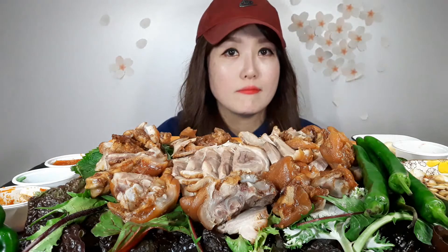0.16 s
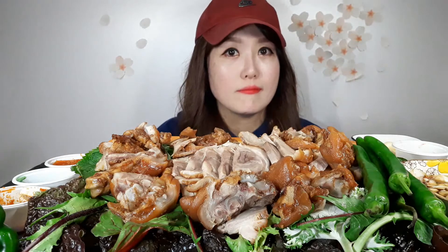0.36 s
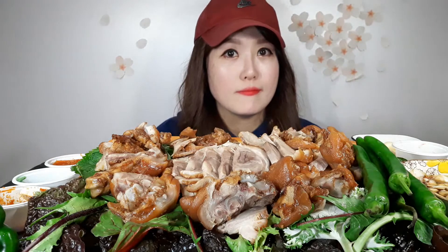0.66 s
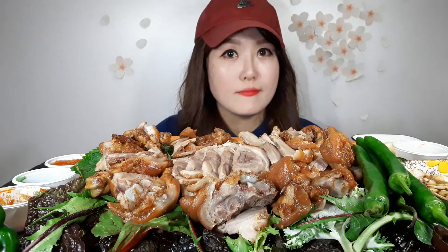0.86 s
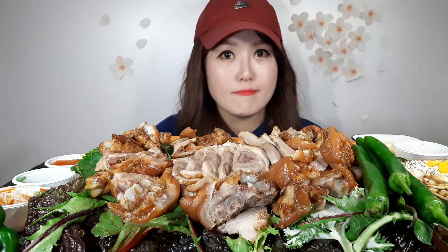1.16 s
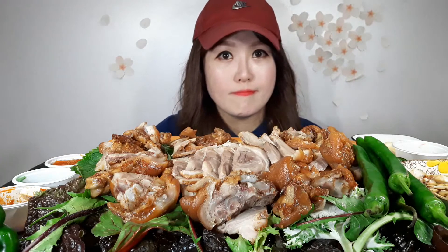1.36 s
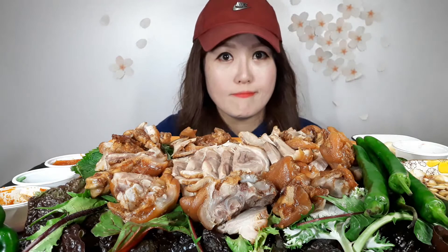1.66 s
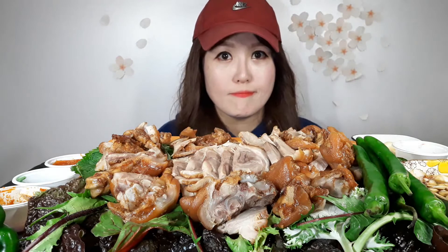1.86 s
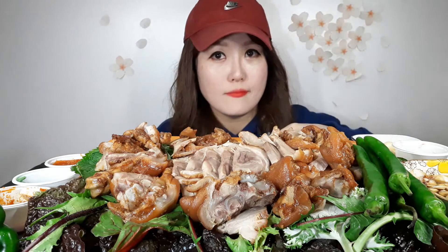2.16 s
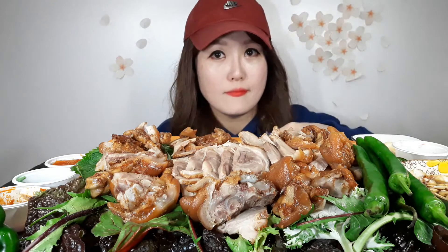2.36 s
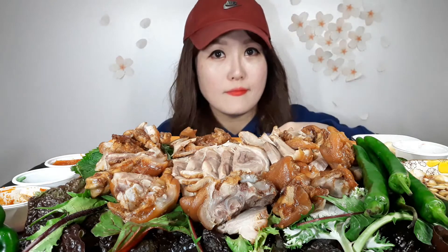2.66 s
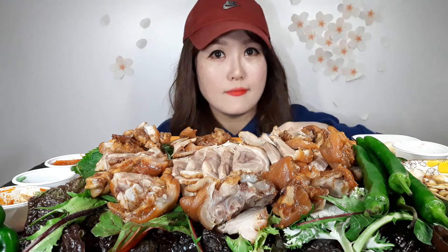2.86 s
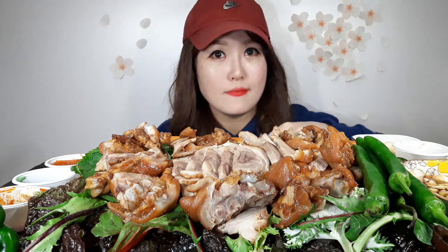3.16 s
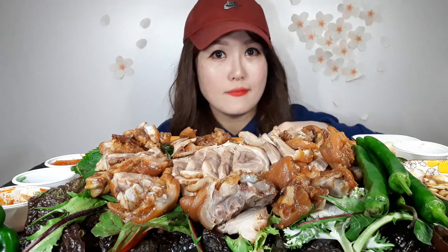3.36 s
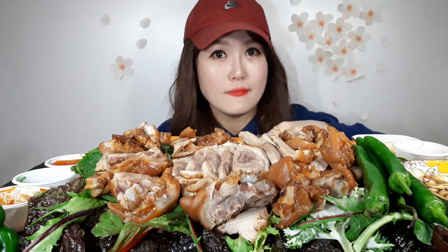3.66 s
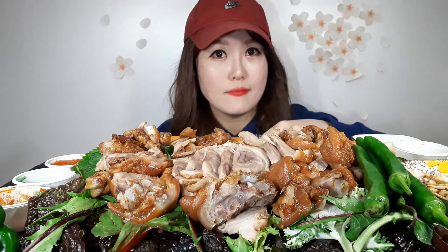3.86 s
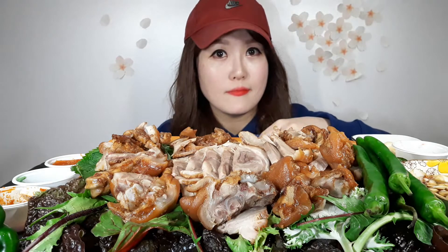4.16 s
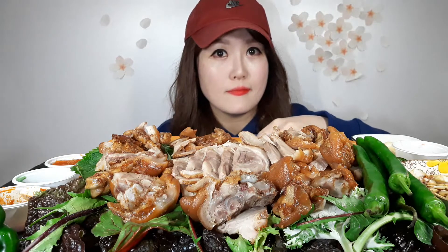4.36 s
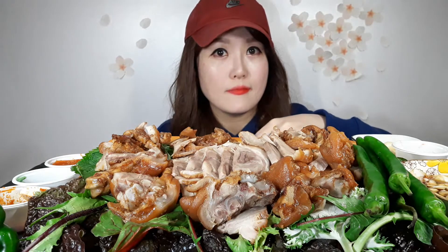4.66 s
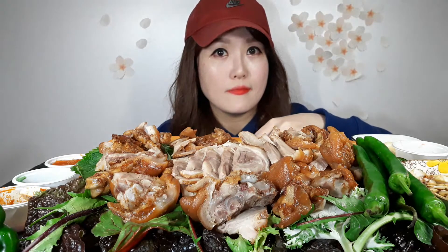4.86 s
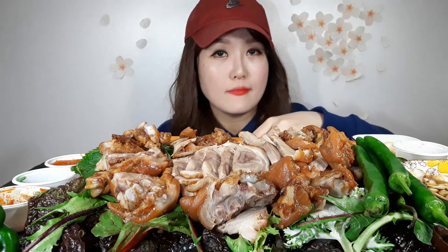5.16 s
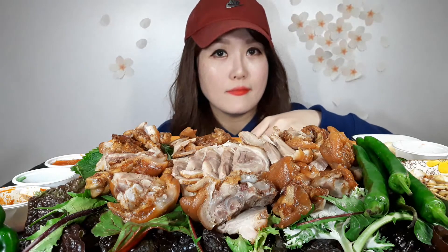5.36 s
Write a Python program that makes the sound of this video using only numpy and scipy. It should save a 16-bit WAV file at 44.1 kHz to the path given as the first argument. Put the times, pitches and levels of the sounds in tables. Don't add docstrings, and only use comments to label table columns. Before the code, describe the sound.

Quiet skin rubs and nail clicks on a thin can lead to a loud double snap of the tab and a short hiss of gas. After some light handling, the sound cuts straight to a very close, dry pour: bubbly knocks inside a glass, crisp fizzing, sharp little snaps, then low puffs of air as foam nears the rim. The pour is still going when it ends.

```python
import sys
import numpy as np
from scipy import signal
from scipy.io import wavfile
from scipy.ndimage import uniform_filter1d, minimum_filter1d

SR = 44100
rng = np.random.default_rng(int(sys.argv[2]) if len(sys.argv) > 2 else 0)


def elevation(decibels):
    levels = np.asarray(decibels, float)
    return 10 ** (levels / 20)


def master(y):
    cut = np.clip(np.atleast_2d(y).T, -1, 1)
    pcm = np.round(cut * 32767)
    wavfile.write(sys.argv[1], SR, pcm.astype(np.int16))


N = 242550
NOW = np.arange(N) / SR
CUT_S = 2.1005


def evened(x):
    return x / np.sqrt(np.mean(x ** 2) + 1e-20)


def read(points, hz):
    f, value = np.transpose(points)
    return np.interp(np.log(hz + 1), np.log(f + 1), value)


def columns(rows, t):
    s, *values = np.transpose(rows)
    return [np.interp(t, s, v) for v in values]


def add(mix, s, sound):
    part = mix[round(s * SR):][:len(sound)]
    part += sound[:len(part)]


def sine(hz, t):
    return np.sin(2 * np.pi * hz * t)


def highpass(order, hz):
    return signal.butter(order, hz, "highpass", fs=SR, output="sos")


def mode(hz, centre_hz, width):
    return 1 / (1 + 2j * (hz - centre_hz) / width)


def shape(x, response):
    hz, t, z = signal.stft(x, SR, nperseg=2048, noverlap=1792)
    gain = response(hz[:, None] + 1, t)
    gain = gain / np.sqrt(np.mean(abs(gain) ** 2, 0))
    return evened(signal.istft(z * gain, SR, nperseg=2048, noverlap=1792)[1][:len(x)])


def crackle(per_s, spread_db):
    size = elevation(spread_db * np.minimum(rng.exponential(1, N), 5)) * rng.standard_normal(N)
    return evened(size * (rng.random(N) < per_s / SR))


def burst(hz, spread, length):
    t = np.arange(3500) / SR
    band = [hz / (1 + abs(spread)), min(hz * (1 + abs(spread)), 17000)]
    bandpass = signal.butter(3, band, "bandpass", fs=SR, output="sos")
    noise = signal.sosfilt(bandpass, rng.standard_normal(3500))
    y = noise * t / length * np.exp(-3 * t / length)
    return y / abs(y).max()


def shell(hz, modes, direct):
    return direct + sum(elevation(db) * mode(hz, f, w) for f, w, db in modes)


def swells(rows):
    rest_db = -88
    return elevation(rest_db) + sum(elevation(db) * np.exp(-((NOW - s) / half) ** 2) for s, db, half in rows)


# middle t/s, level/dB, half length t/s
LEANS = [
    (.3, -82, .1),
    (1.1, -64.5, 0.16),
    (1.33, -65, 0.074),
    (1.61, -76.5, 0.092),
    (2.02, -71, .05),
]


def leaning():
    rumble = shape(crackle(2300, 1.7), lambda hz, t: mode(hz, 60, 130) * hz / (hz + 40))
    return elevation(-1.0) * swells(LEANS) * rumble


# middle t/s, level/dB, half length t/s
SLOSHES = [
    (.83, -89, .06),
    (1.18, -74, 0.085),
    (1.51, -64.5, 0.033),
    (1.89, -61.5, 0.079),
    (2.03, -70, 0.046),
]


def sloshing():
    def gurgle(hz, t):
        return mode(hz, 800, 460) * hz / (hz + 200) + 0.22 * mode(hz, 2100, 1500)
    return elevation(-0.5) * swells(SLOSHES) * shape(crackle(1000, 1.7), gurgle)


# t/s, level/dB
GRIP = [(0.0, -69), (0.27, -67.5), (0.42, -66.5), (0.69, -68.5), (0.83, -64), (0.93, -58.5), (1.07, -56),
        (1.17, -47.5), (1.24, -56), (1.35, -55), (1.51, -61.5), (1.61, -67), (1.88, -65), (2.02, -64),
        (2.09, -72.5)]
# f/Hz, level/dB (per Hz)
RUB = [(530, -54), (900, -28), (1130, -22), (1610, -8.5), (2070, -16), (2510, -9), (4880, -13.5),
       (5910, -15), (15500, -22)]
# f/Hz, width f/Hz, level/dB
HELD = [(1200, 200, -12), (1600, 330, 1), (2390, 250, -13.5), (2900, 130, -4), (3550, 130, -3.5),
        (4600, 300, -3), (5640, 500, -2), (6360, 770, -2)]


def rubbing():
    def skin(hz, t):
        patches = uniform_filter1d(rng.standard_normal((len(hz), len(t))), 25, 0)
        patches = evened(uniform_filter1d(patches, 9, 1))
        return elevation(read(RUB, hz) + 3.5 * patches) * abs(shell(hz, HELD, .3))
    return elevation(columns(GRIP, NOW)[0] - 2.0) * shape(crackle(9000, 2.5), skin)


# t/s, peak level/dB, centre f/Hz, length t/s, spread as a share of the centre
SCRAPES = [(0.298, -45, 3000, 0.028, 0.44), (0.31, -31, 3140, 0.0092, 0.28), (0.31, -42, 1440, 0.02, 0.17),
           (0.31, -40.5, 6300, 0.022, 0.2), (0.72, -48.5, 3100, 0.022, 1.2), (0.76, -38, 3600, 0.021, 1.16),
           (1.016, -45.5, 2440, .006, 0.073), (1.027, -48, 5500, .008, .8),
           (1.510, -36.5, 5300, 0.004, 0.48), (1.509, -48, 640, 0.0055, .35),
           (0.125, -51.5, 1200, 0.0045, 0.32), (1.512, -46, 1230, 0.0093, 0.1),
           (1.66, -51, 5800, .03, 0.27), (1.661, -52.5, 3700, 0.019, 0.033)]
# t/s, peak level/dB, centre f/Hz
TICKS = [(0.1281, -60, 2200), (0.34, -45.5, 1600), (0.3636, -39.5, 5050), (0.375, -56, 6280),
         (0.404, -40.5, 2900), (0.418, -39, 5070), (0.4804, -41.5, 5400), (0.655, -55, 1590),
         (0.654, -54, 6300), (0.3635, -48, 2400), (0.4804, -46, 2800), (0.985, -49, 1500),
         (0.58, -60, 8000), (0.606, -61, 7800), (1.141, -46, 1640), (1.2094, -49, 3600), (1.489, -38, 2560),
         (1.51, -25.5, 2690), (1.5539, -47, 1445), (1.6606, -47, 3850), (1.683, -52.5, 7400),
         (1.769, -50, 4950), (1.836, -47.5, 1010), (1.936, -54.5, 2480)]


def ticking():
    tick_s, tick_spread = .0012, .85
    ring_db, ring_s = -13, .0035
    out, t = np.zeros(N), np.arange(2000) / SR
    for s, db, hz, length, spread in [(*row, tick_s, tick_spread) for row in TICKS] + SCRAPES:
        add(out, s - .001, elevation(db) * burst(hz, spread, length))
    for s, db, hz in TICKS:
        add(out, s, elevation(db + ring_db) * sine(hz, t) * np.exp(-t / ring_s))
    return out


# f/Hz, width f/Hz, level/dB
CAN = [(1640, 160, 1.5), (2817, 210, 5), (3620, 170, 1.5), (4380, 51, 2.5), (5240, 160, 5.5),
       (5780, 720, 9.5), (6460, 820, -4.5)]
# f/Hz, level/dB (per Hz)
TEAR = [(530, -73), (900, -25), (1570, -8.5), (4010, -5), (4360, 4), (4800, -13.5), (5890, -8.5),
        (16000, -58.5)]
# f/Hz, time to fall by 60 dB t/s
VENT = [(1200, 0.27), (3000, 0.14), (6000, 0.15), (10000, 0.37)]


def gas_jet():
    t = np.arange(SR // 2) / SR
    rise_s = .022
    hz, frames, z = signal.stft(rng.standard_normal(len(t)), SR, nperseg=512, noverlap=448)
    dying_db = read(TEAR, hz)[:, None] - 60 * np.outer(1 / read(VENT, hz), frames)
    wall = abs(shell(hz, CAN, .2)) * hz ** 8 / (hz ** 8 + 1400 ** 8)
    jet = signal.istft(z * elevation(dying_db) * wall[:, None], SR, nperseg=512, noverlap=448)[1][:len(t)]
    flutter_db = 2.9 * evened(uniform_filter1d(rng.standard_normal(len(t)), size=130))
    out = np.zeros(N)
    add(out, 1.284, elevation(-31.5) * evened(jet * np.minimum(t / rise_s, 1) * elevation(flutter_db)))
    return out


# t/s, peak level/dB, length t/s
TEARS = [(1.2815, -24, 0.0034), (1.2842, -1.5, 0.0012), (1.2857, .5, 0.0012), (1.2877, -6.5, 0.0015),
         (1.2945, -12, .002), (1.2960, -4, .0012), (1.2973, -2.5, .0009), (1.2995, -12, .003),
         (1.3005, -9.5, 0.0022), (1.3040, -8, .003), (1.3090, -12, .003), (1.3122, -14.5, .003),
         (1.3150, -13, .003), (1.323, -16, .003), (1.3310, -20, .004)]


def tab():
    out, t = np.zeros(N), np.arange(SR // 2) / SR
    start = t[:400]
    for s, db, length in TEARS:
        shake = sum(elevation(d) * np.sin(2 * np.pi * (f * start + rng.random())) for f, _, d in CAN)
        shake = shake * np.sin(np.pi * np.minimum(start / length / 1.86, 1)) ** 2
        add(out, s, elevation(db) * shake / abs(shake).max())
    out = signal.sosfiltfilt(highpass(4, 1350), out)
    add(out, 1.2845, elevation(-16) * burst(10000, .6, .0035))
    thud = sine(130, t) * np.exp(-t / 0.0011) + 0.99 * sine(750, t) * np.exp(-t / 0.0006)
    add(out, 1.285, elevation(-21.5) * thud)
    return out


def elapsed(t):
    return np.clip((t - CUT_S) / (N / SR - CUT_S), 0, 1)


# t/s, share filled
FILL = [(2.1, 0.01), (3.0, 0.16), (3.8, 0.3), (4.6, 0.48), (5.5, 0.55)]


def filled(t):
    return columns(FILL, t)[0]


# t/s, level/dB
POUR = [(2.3, -8.5), (2.5, -0.2), (2.75, -1.5), (3.1, -1), (3.37, 0.3), (3.71, 0), (4.04, 1), (4.11, -1),
        (4.27, 3.5), (4.41, 2), (4.8, 5), (5.13, 1.5), (5.5, 2.5)]


def churn_db():
    return columns(POUR, NOW)[0]


# start f/Hz, end f/Hz, power of the elapsed share
RISE = [(620, 695, 1.8), (1570, 2150, 1.1), (2490, 2730, .4), (3620, 3300, .9), (4400, 4230, .5),
        (5400, 5850, .9), (6800, 6400, .8)]
# width f/Hz, width f/Hz, level/dB, level/dB
COLUMN = [(60, 75, 0, 0), (130, 500, 11.5, 5), (230, 60, 5.5, 9), (300, 150, -3, 19), (300, 200, -2, 8),
          (900, 700, -2, 1), (400, 1100, 5.5, 1)]


def column(t):
    fill = filled(t)
    rows = []
    for (a, b, power), (w, x, p, q) in zip(RISE, COLUMN):
        hz = a + (b - a) * elapsed(t) ** power
        rows.append((hz, w + (x - w) * fill, p + (q - p) * fill))
    return rows


def table_shake():
    shake = shape(crackle(1500, 0.83), lambda hz, t: mode(hz, 64, 61) ** 2 * hz / (hz + 30))
    return elevation(-61 - 11 * elapsed(NOW)) * shake


def puffs():
    gusts = shape(crackle(500, 2.5), lambda hz, t: mode(hz, 68, 410) * hz ** 2 / (hz ** 2 + 50 ** 2))
    return elevation(-63.5 + 1.1 * churn_db() + 23.5 * elapsed(NOW) ** 3.4) * gusts


def mist():
    spray = shape(crackle(4000, 2.8), lambda hz, t: mode(hz, 9200, 3500) ** 2)
    return elevation(-56 + 0.42 * churn_db() + 13 * elapsed(NOW)) * spray


def plops():
    def lowest(hz, t):
        wander = 1 + 0.0043 * np.sin(2 * np.pi * 7 * t + 3 * np.sin(2 * np.pi * 2.1 * t))
        ring = mode(hz / wander, *column(t)[0][:2])
        ring = ring + (0.036 + 0.27 * filled(t)) * mode(hz, 386, 400) + 0.059 * mode(hz, 670, 260)
        ring = ring + .3 * (1 - elapsed(t)) ** 7.3 * mode(hz, 760, 150)
        return ring * hz ** 2 / (hz ** 2 + 300 ** 2)
    return elevation(-37 + churn_db()) * shape(crackle(6000, 1.6), lowest)


def grains(per_s, spread_db, cycles, count=48):
    size, which, out = crackle(per_s, spread_db), rng.integers(0, count, N), np.zeros(N)
    for k, hz in enumerate(np.linspace(1200, 12000, count)):
        turns = np.arange(round(4 * cycles * SR / 4000)) * hz / SR
        note = np.sin(2 * np.pi * turns * (1 + 0.0033 * turns))
        note = note * turns * np.exp(-2.5 * turns * 4000 / hz / cycles)
        out += signal.oaconvolve(size * (which == k), note / np.linalg.norm(note))[:N]
    return evened(out)


# f/Hz, level/dB (per Hz)
FIZZ = [(200, -23), (500, -1.5), (1100, -12), (2100, -5.5), (4100, 3), (7800, -1.5), (9000, -10.5),
        (12000, -20), (16000, -24.5)]


def fizz():
    def foam(hz, t):
        early = 1.3 * (1 - elapsed(t)) ** 11.0 * abs(mode(hz, 2100, 770))
        straight = elevation(read(FIZZ, hz)) * (0.68 + 1.3 * filled(t) + early)
        upper = sum(abs(elevation(db) * mode(hz, f, w)) ** 4 for f, w, db in column(t)[1:]) ** .5
        upper = upper * hz ** 4 / (hz ** 4 + 900 ** 4) / (1 + (hz / 8000) ** 8)
        dip = 1 - .7 * (1 - filled(t)) ** 2 * abs(mode(hz, 4150, 700)) ** 2
        return dip * np.sqrt(straight ** 2 + upper)
    source = grains(20000, 1.5, cycles=9) + .7 * crackle(25000, 1)
    return elevation(-34 + 9.5 * filled(NOW)) * shape(source, foam)


# t/s, peak level/dB
SPITS = [
    (3.2314, -20),
    (3.264, -11.5),
    (3.3328, -19),
    (3.3742, -20),
    (3.3874, -24),
    (3.4694, -18),
    (3.485, -18.5),
    (4.9327, -7.5),
]


def spits():
    out, t = np.zeros(N), np.arange(2500) / SR
    for s, db in SPITS:
        add(out, s, elevation(db + 4.0) * sine(3000, t) * np.exp(-t / 0.00012))
    return out


# t/s, peak level/dB, f/Hz
SNAPS = [(2.9944, -23, 1150), (2.372, -24.5, 6700), (2.506, -23.5, 6810), (3.158, -23, 6500),
         (2.462, -21, 6780), (3.374, -20, 6400), (4.4575, -20, 6700), (3.5787, -17.5, 4900),
         (3.3325, -27, 9300), (2.524, -19, 5400), (2.5632, -15.5, 6700), (2.5755, -16, 6700),
         (2.592, -16.5, 5400), (2.631, -11, 6290), (2.6847, -16.5, 6860), (2.7207, -14.5, 6750),
         (2.8288, -6, 6090), (2.868, -16, 5070), (2.911, -14, 6100), (2.923, -7, 5900), (2.959, -7.5, 6200),
         (3.0144, -14.5, 5340), (3.0672, -17.5, 4660), (3.1238, -13.5, 6830), (3.2527, -17, 6200),
         (3.264, -11.5, 6550), (3.3345, -20, 5160), (3.5766, -11, 7800), (3.85, -17.5, 6100),
         (4.073, -20, 6360), (4.2656, -14.5, 6130), (4.935, -14, 6600), (5.0104, -10, 5470),
         (5.0319, -8, 3920), (5.0805, -6, 5750), (5.1547, -18, 6030), (5.3737, -10.5, 5500),
         (5.3988, -14.5, 6040), (5.4641, -24, 6620)]


def snaps():
    decay_cycles = 4.02
    out, t = np.zeros(N), np.arange(2500) / SR
    for s, db, hz in SNAPS:
        cross_hz = [4960] + [f for f, _, _ in column(s)[5:]]
        cross = sum(np.sin(2 * np.pi * f * t + k) for k, f in enumerate(cross_hz))
        snap = sine(hz, t) + 0.83 * min(hz / 5500, 1) ** 4 * cross
        snap = snap * np.exp(-hz * t / decay_cycles) * np.minimum(t / 0.0007, 1)
        breath = burst(1.04 * hz, 0.35, 0.0074)[:2500]
        add(out, s - .0004, elevation(db + 4.0) * snap + elevation(db - 12) * breath)
        add(out, s, elevation(db - 23.5 - 12 * elapsed(s)) * burst(11500, 0.4, 0.003))
    return out


def air_push(db):
    t = np.arange(2500) / SR
    return elevation(db) * sine(130, t) * t / 0.0031 * np.exp(-t / 0.0021)


# t/s, level/dB
BLOWS = [(4.265, -35), (4.596, -30), (4.693, -32), (4.81, -36), (4.836, -11.5), (4.936, -15.5),
         (5.009, -23), (5.086, -21), (5.263, -24), (5.3, -20), (4.72, -27), (5.33, -27), (5.411, -26),
         (5.47, -21), (5.355, -18.5), (5.439, -19)]


def blows():
    out = np.zeros(N)
    for s, db in BLOWS:
        add(out, s, air_push(db))
    return out


# t/s, column ring level/dB, own note level/dB, note f/Hz, upper modes
# level/dB
GLUGS = [(2.221, -21.5, -34, 750, -28.0), (2.2876, -18.5, -26.5, 755, -28),
         (2.3084, -56.5, -27.5, 625, -25), (2.3546, -18.5, -30, 740.0, -27.5),
         (2.3673, -36.0, -29, 740.0, -25), (2.3711, -20.5, -34, 680.0, -19.5),
         (2.3995, -19, -37.0, 543, -32), (2.463, -8.5, -16.5, 716.3, -11.5), (2.4873, -24, -37, 585, -34),
         (2.5055, -23.5, -22, 680.0, -33), (2.5155, -26, -28, 635, -20), (2.525, -15, -37, 540.0, -24.5),
         (2.5424, -15, -19.5, 730, -21), (2.5644, -14, -20, 680.0, -16), (2.5755, -21, -26, 626, -25),
         (2.6137, -53.5, -24.0, 740.0, -31), (2.6314, -49.0, -20.5, 600, -31),
         (2.6841, -7.5, -26, 537, -22), (2.7217, -3.5, -17, 635, -10.5), (2.808, -53.5, -24, 584, -26),
         (2.8288, -8.0, -8.5, 620, -11.5), (2.8337, -13, -35, 537, -27), (2.8639, -16.5, -27, 580.0, -27),
         (2.8799, -52.0, -21.5, 574.5, -19), (2.9107, -9.5, -17, 580.0, -25.5),
         (2.9221, -6.5, -31, 930.0, -17), (2.9596, -6, -22, 456, -18.5), (2.9949, -33.5, -3.5, 587, -18),
         (3.0012, -43.0, -13.5, 590, -21), (3.0124, -23, -22.5, 460.0, -29.0),
         (3.0397, -9.0, -30, 403, -32.5), (3.0494, -14, -28, 400.0, -29.5), (3.0637, -22, -31, 430.0, -21),
         (3.088, -12, -29, 930.0, -28),
         (3.156, -13.5, -20, 457, -18), (3.161, -15.5, -29.0, 500.0, -27.0),
          (3.2024, -18, -24.5, 460.0, -32), (3.2529, -4.5, -19, 385, -23), (3.2578, -29, -25, 460.0, -31.5),
          (3.2637, -8, -22, 850, -12.5), (3.29, -20, -26.5, 422, -33), (3.3339, -17, -17, 536, -20),
          (3.374, -29.0, -29, 790.0, -24), (3.3869, -57.0, -30, 690, -28.5),
          (3.4856, -16.5, -25, 480, -18.5), (3.5482, -24.5, -33, 744, -26.5),
          (3.8872, -18, -36, 547, -27.0), (4.0126, -51.0, -22, 680.0, -27.5),
          (4.0183, -19, -37, 540.0, -32), (4.0353, -18.5, -35, 540.0, -31.5),
          (4.0598, -17.5, -39, 220.0, -24), (4.2367, -18, -34.5, 580.0, -29.5),
          (4.2506, -53.0, -25, 580.0, -26.0), (4.264, -7.5, -41, 990, -18), (4.31, -14, -24.5, 576, -27),
          (4.457, -26, -26.5, 680.0, -31.0), (4.5092, -20, -40, 790.0, -25),
          (4.5439, -21, -40, 500.0, -28.0), (4.5942, -24, -35, 500.0, -32.0),
          (4.6595, -14.5, -35, 920, -24), (4.6906, -53.0, -23.5, 730, -25),
          (4.6991, -13.5, -28, 630.0, -20), (4.711, -14, -33, 920, -21), (4.7217, -17.5, -42, 540.0, -26),
         (4.7689, -26, -22, 620, -24), (4.7739, -13.0, -37, 860.0, -25.5),
            (4.7907, -52.0, -25, 666, -15.5), (4.811, -19.0, -28.5, 780, -23),
            (4.8347, -9, -38.5, 860.0, -27.5), (4.8448, -13, -30.0, 253, -27.5),
            (4.9323, -24, -23, 430.0, -27), (4.9603, -42.0, -24.0, 587, -32.0),
            (4.9717, -13.5, -25, 616, -28.0), (4.9966, -28, -24, 780, -25.5), (5.0036, -18, -27, 570, -23),
            (5.0205, -54.5, -23, 740.0, -28.5), (5.0727, -22, -33, 870, -29.0),
            (5.0835, -10.5, -28, 267, -23), (5.1783, -23, -28, 800, -26), (5.1824, -10.0, -24, 586, -29.5),
            (5.1889, -2.0, -15, 273, -21), (5.1901, -21, -20, 603, -21), (5.2418, -52.0, -22, 670, -29.5),
            (5.2522, -22, -25, 630.0, -32), (5.261, -13, -34, 865, -30.5),
            (5.2717, -15.5, -36, 540.0, -28.5), (5.3876, -15, -31, 503, -31.5),
            (5.3957, -55.0, -28, 640, -31.0), (5.44, -22, -41, 920, -35), (5.4506, -15.0, -29, 573, -29.5)]


def large_bubbles():
    note_s = .0017
    pop_s, swell_s = .0004, .0014
    push_db = -38.5
    knocks, notes, pushes = np.zeros((3, N))
    t = np.arange(2500) / SR
    for s, db, note_db, note_hz, upper_db in GLUGS:
        detune = rng.uniform(-1, 1, 3) * [0, .025, .025]
        rings = [sine(f * (1 + v), t) * np.exp(-np.pi * 1.15 * w * t)
                 for (f, w, _), v in zip(column(s)[:3], detune)]
        knock = elevation(db) * rings[0] * (1 - np.exp(-t / swell_s))
        knock = knock + elevation(upper_db + 4.0) * (rings[1] + 0.36 * rings[2])
        add(knocks, s, -knock * (1 - np.exp(-t / pop_s)))
        add(notes, s, -elevation(note_db) * sine(note_hz, t) * t / note_s * np.exp(1 - t / note_s))
        add(pushes, s, air_push(max(db, note_db) + push_db))
    knocks = signal.sosfilt(highpass(2, 400), knocks)
    return knocks + signal.sosfiltfilt(highpass(2, 150), notes) + pushes


def scene():
    can = leaning() + sloshing() + rubbing() + ticking() + gas_jet() + tab()
    glass = table_shake() + puffs() + mist() + plops() + fizz()
    glass = glass + spits() + snaps() + blows() + large_bubbles()
    after = np.clip((NOW - CUT_S) / 0.0034, 0, 1)
    mono = (1 - after) * can + after * glass
    return np.array([mono, mono])


def masked(x, size, bins, frames, under_db):
    hz, t, z = signal.stft(x, SR, nperseg=size, noverlap=size // 2)
    power = abs(z.mean(0)) ** 2
    whole = minimum_filter1d(power.mean(0), frames)
    usual = uniform_filter1d(power, 4096 // size * 3, axis=1)
    usual = uniform_filter1d(usual, size // 64, axis=0)
    mood_db = 3 * evened(uniform_filter1d(rng.standard_normal(len(t)), 4096 // size))
    limit = whole ** .3 * abs(usual) ** .7 * elevation(2 * (under_db + mood_db - 4 * elapsed(t)))
    weak = uniform_filter1d(power, bins, axis=0) < limit
    treble = (hz > 8300)[:, None]
    return signal.istft(z * ~(weak & treble), SR, nperseg=size, noverlap=size // 2)[1][:, :N]


def band_limit(x):
    return signal.sosfilt(signal.butter(12, 15800, fs=SR, output="sos"), x)


def record(dry):
    trace = elevation(-44.5) * abs(dry[0]) * rng.standard_normal(N)
    mix = signal.sosfilt(highpass(2, 36), dry)
    mix = np.clip(mix + [trace, -trace], -1, 1)
    lowpass = signal.firwin(511, 15900, window=("kaiser", 8), fs=SR)
    mix = signal.oaconvolve(mix, lowpass[None], "same")
    mix = masked(mix, size=256, bins=3, frames=1, under_db=-11.5)
    mix = masked(mix, size=2048, bins=1, frames=5, under_db=-10.5)
    return band_limit(mix)


dry = scene()
out = record(dry)
master(out)
```